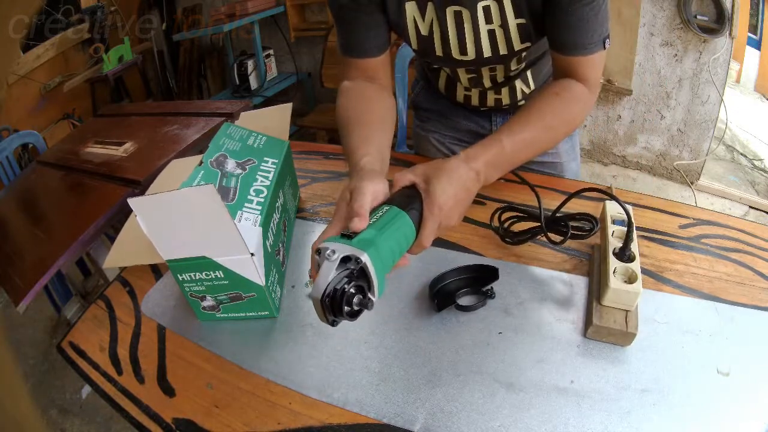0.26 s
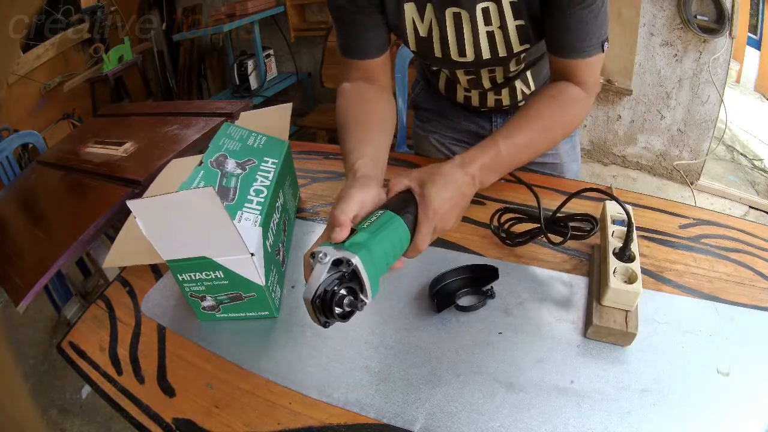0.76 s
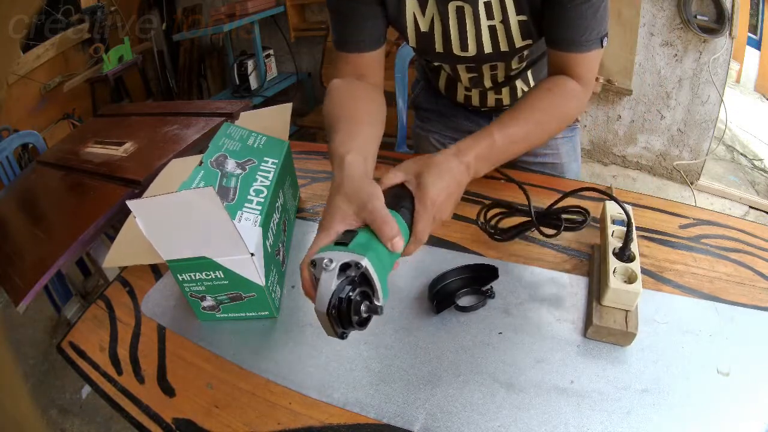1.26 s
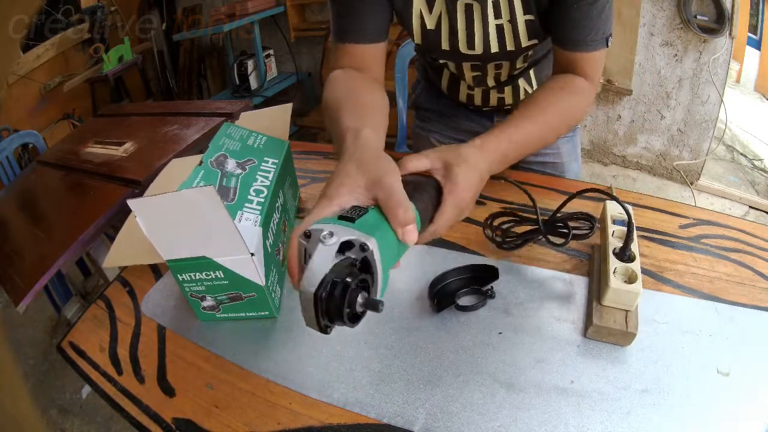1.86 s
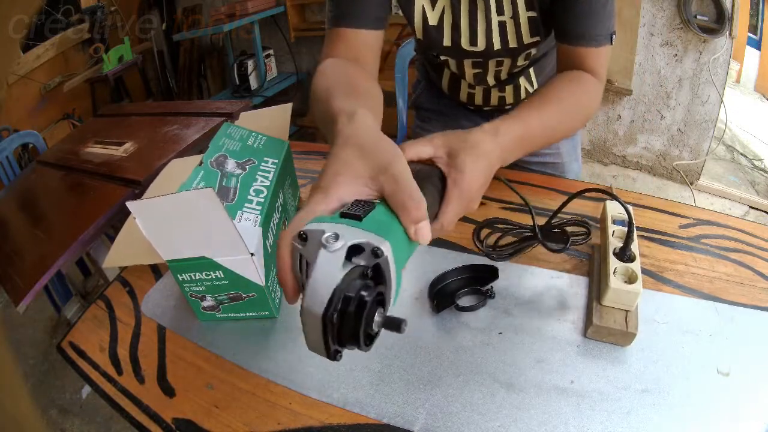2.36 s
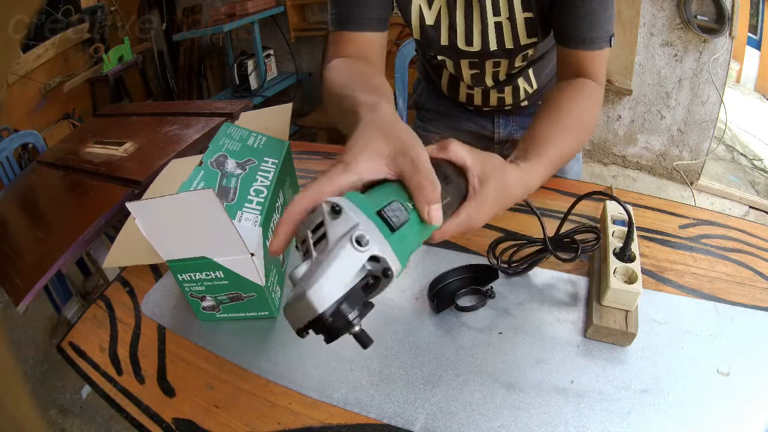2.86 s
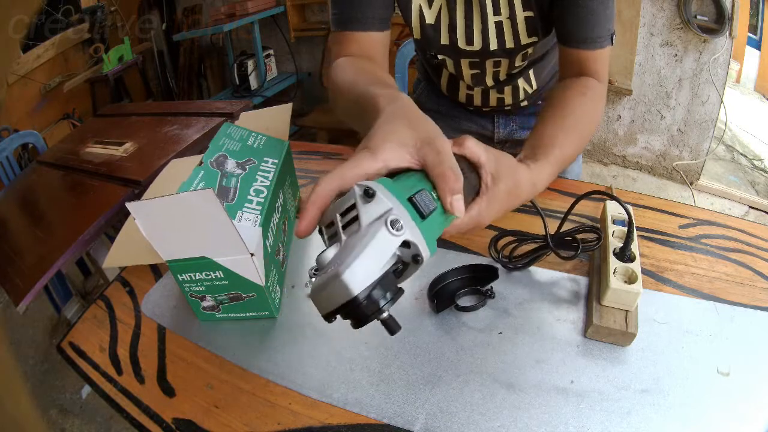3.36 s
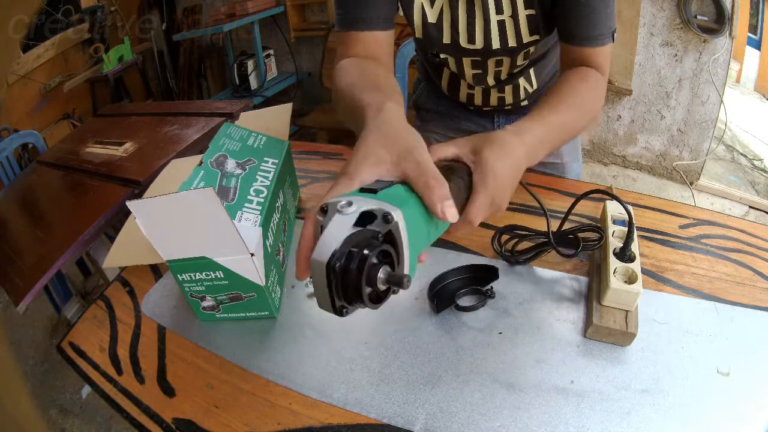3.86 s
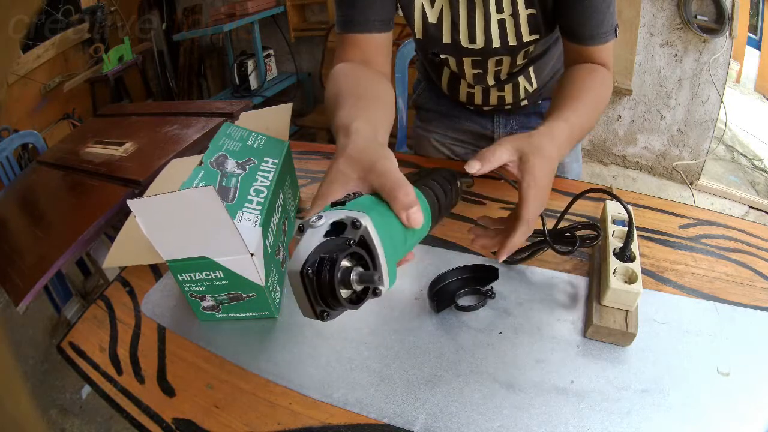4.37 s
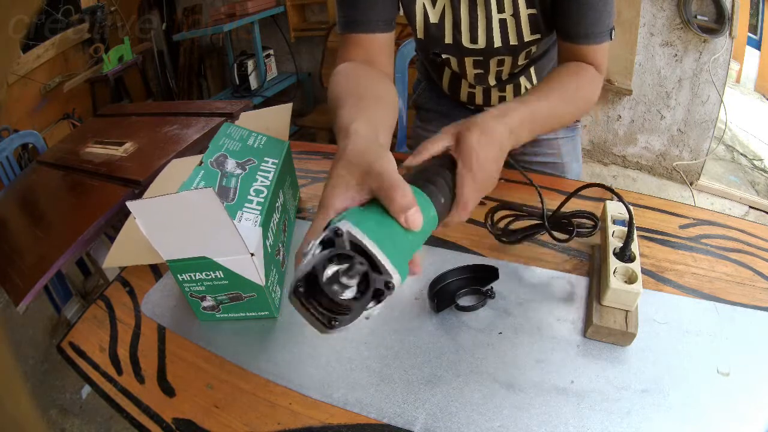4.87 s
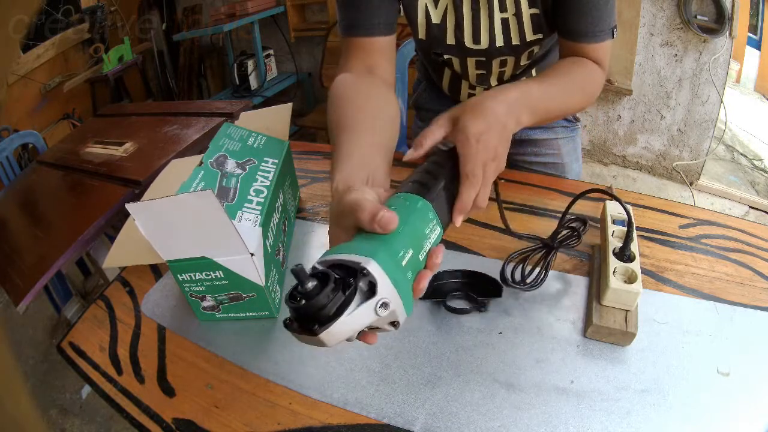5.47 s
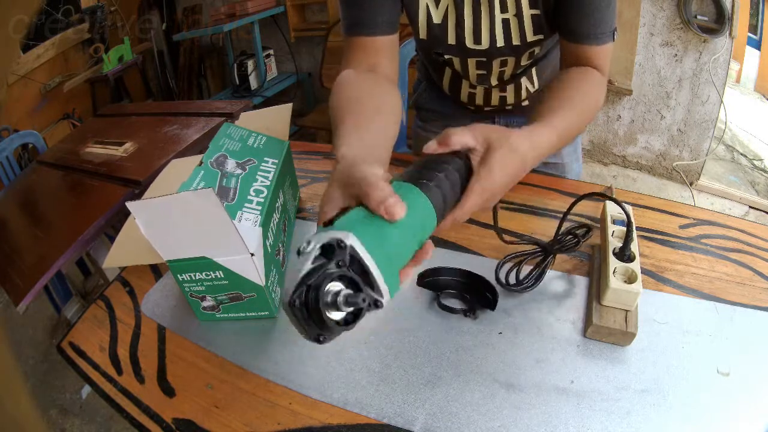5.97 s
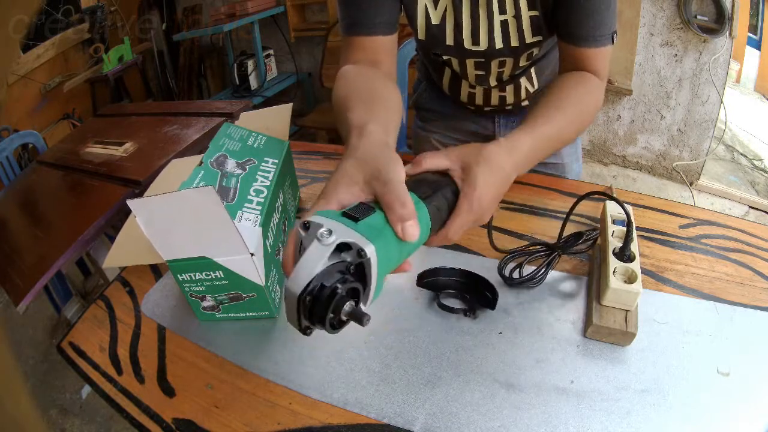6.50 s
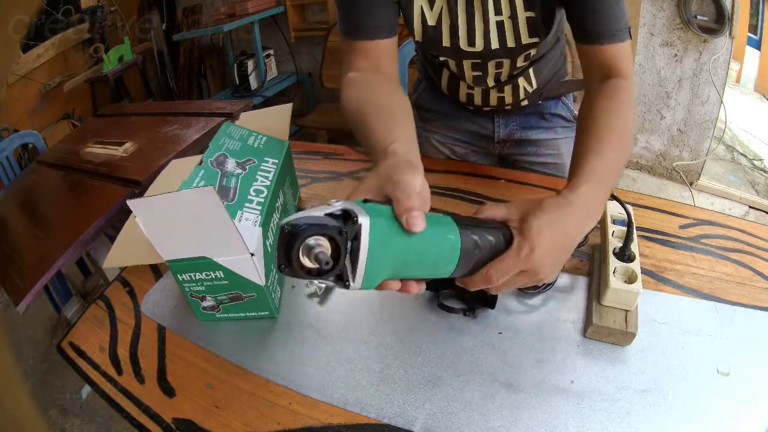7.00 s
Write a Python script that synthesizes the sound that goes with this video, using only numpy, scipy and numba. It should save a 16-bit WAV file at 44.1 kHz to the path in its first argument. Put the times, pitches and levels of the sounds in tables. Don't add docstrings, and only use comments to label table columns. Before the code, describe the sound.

Faint yard hum, a thumb click, then a bare hand-held grinder kicks abruptly into a bright rushing whir, with low wind-like thuds as it turns.

```python
import sys
import numpy as np
from scipy import signal
from scipy.fft import rfft, irfft
from scipy.io import wavfile
from scipy.ndimage import uniform_filter1d
from numba import njit

SR = 44100
rng = np.random.default_rng(int(sys.argv[2]) if len(sys.argv) > 2 else 0)


def to_wav(sig):
    pcm = np.clip(np.atleast_2d(sig), -1, 1) * 32767
    pcm = np.round(pcm).astype(np.int16)
    wavfile.write(sys.argv[1], SR, pcm.T)


def gain_from_db(level_db):
    decades = np.asarray(level_db, float) / 20
    return 10 ** decades


N = 319284
T = np.arange(N) / SR

# (time [s], level [dB])
YARD = [(0, -42), (.246, -42.5), (.3, -41), (.45, -52), (.6, -62), (2.6, -57.5), (3.2, -52), (5.2, -53.5),
        (7.24, -50.5)]
# (frequency [Hz], density [dB per Hz])
YARD_COLOUR = [(15, -30), (30, -2), (70, -1.5), (200, -2.5), (700, -11.5), (3000, -27.5), (5500, -24.5),
               (15000, -34)]
# (frequency [Hz], width [Hz], level [dB])
YARD_DRONES = [(104, 25, -12.5), (337.5, 18, -10.5), (500, 25, -12.5), (750, 16, -6)]
# (time [s], peak [dB], frequency [Hz])
TICKS = [
    (0.1141, -29, 4250),
    (0.2454, -33, 5130),
]
# (speed [Hz], time constant [s])
SPIN_UP = [
    (211, .16),
    (197, .52),
]
# (time [s], depth [0-1])
SPARK = [(.27, 0.4), (.3, 0.6), (.34, 0.33), (.45, 0.15), (.8, 0), (2, 0), (7.24, 0)]
# (time [s], level [dB])
SLAM = [(.272, -27), (.282, -22), (.285, -8), (.31, -2), (.335, -6), (.37, -19), (.46, -16), (.55, -32),
        (.7, -60)]
# (time [s], extra gain [dB])
OVERSHOOT = [(.274, -1), (.284, 11), (.314, 14), (.354, 7.5), (.468, 4.5), (.57, 0), (.68, 0)]
# (time [s], nearness [dB], grip turned to the microphone [0-1],
# side vent aim [-1..1], fan outlet aim [-1..1])
POSE = [(.68, -19.5, 0, 0.025, .1), (1.1, -21, 0.06, .4, 0.37), (2.3, -20, 0, 0.09, 0.34),
        (2.74, -20.5, 0.2, 0.66, 0.29), (2.92, -22.5, .6, 0.27, 0.034), (3.06, -20.5, .6, .3, -.2),
        (3.15, -22.5, 0.46, .1, -.5), (3.24, -19, .4, 0, -1), (3.58, -19.5, 0.55, 0.077, -1.1),
        (3.87, -20, .25, 0.51, -0.36), (4.25, -19.3, 0.55, -.7, -0.2), (5.06, -19.2, 0.74, -0.89, -0.046),
        (5.2, -21.5, 1, 0.76, 0.34), (5.74, -21, 0.97, 0.63, .5), (5.92, -18, .7, -0.93, -.1),
        (6.25, -20, 0.93, -0.27, 0.32), (6.72, -21.5, 0.94, .1, .5), (6.96, -18.5, 0.78, -.6, -0.46)]
# (frequency [Hz], width [Hz], level [dB])
GRIP_MODES = [(605, 425, -8.5), (1198, 303, 0), (1716, 420, -1.5), (2570, 1150, -5.5)]
HEAD_MODES = [(3602, 940, -5.5), (4210, 570, -7), (4840, 810, -1), (6040, 1140, -6)]
VENT_MODES = [(7220, 990, -3.5), (7930, 450, -1), (8430, 850, -3)]
OUTLET_MODES = [(10190, 1400, -3), (11350, 2100, -5), (12000, 890, -3), (12960, 1200, -8),
                (14900, 1400, -16.5)]
# (time [s], half length [s], gain [dB])
WHISTLE_PASSES = [(1.5, .8, 4), (5.88, .12, 8), (6.6, .45, 6)]
WHINE_ORDERS = (1, 2, 12, 24)
# (level [dB], gain with the grip turned [dB], gain per dB of overshoot [1])
TONES = [
    (-51, 12.5, .7),
    (-50, 16.5, 0.5),
    (-56, 0, 0),
    (-42, 0, .4),
]
# (time [s], half length [s], gain [dB])
GLINTS = [
    [(3.2, .4, 3.5), (4.4, 0.45, 3), (.33, .05, 3.5), (5.0, 0.11, -10), (5.4, 0.31, -4.5), (5.78, .1, -11),
     (6.9, 0.49, 3)],
    [(.7, .3, -8), (1.7, .5, 7), (3.2, 0.7, -12), (4.2, .15, 6), (5.35, 0.28, 2.5), (7.0, 0.11, 6)],
    [(.46, .07, 35)],
    [(.355, .05, 21), (.58, .08, 13), (1.16, .25, 13), (1.7, .25, 5), (2.5, .25, -6), (4.4, .6, 9),
     (6.82, .12, 13), (7.24, .15, 6)],
]
# (time [s], centre [Hz])
SIDE_BANDS = [(0.803, 11300), (1.103, 5700), (1.103, 8600), (1.22, 6900), (1.619, 4700), (1.987, 13000),
              (2.152, 12400), (2.198, 11700), (2.241, 9300), (2.405, 7550), (2.405, 13100), (3.289, 10300),
              (3.848, 8250), (4.843, 11300), (6.006, 6000), (6.006, 8250), (6.006, 14000), (6.097, 8950),
              (6.865, 4700)]
# (time [s], peak [dB], time to fall 10 dB [s], 0 = too short to be heard)
GUSTS = [(2.4, -56, 0), (2.76, -38, 0), (2.87, -25, .025), (2.954, -15, 0.02), (3.04, -14.5, 0.0462),
         (3.11, -14, 0.0366), (3.19, -20, .03), (3.28, -16, 0.0535), (3.39, -21, .06), (3.51, -13.5, .05),
         (3.61, -13, .06), (3.69, -16, .04), (3.76, -15.5, .025), (4.03, -29, .025), (4.16, -27, .05),
         (4.22, -27.5, .06), (4.33, -33, .06), (4.44, -23, 0.05), (4.53, -24, 0.06), (4.66, -24.5, .09),
         (4.8, -23.5, 0.08), (4.93, -24.5, 0.06), (5.0, -33, 0.02), (5.99, -40, .03), (6.09, -35, .07),
         (6.2, -31, .05), (6.43, -44, .05), (6.62, -41, 0.03)]
# (time [s], peak [dB], pitch [Hz])
THUMPS = [(2.943, -9, 66), (3.045, -5, 200), (3.074, -5.5, 66), (3.235, -10, 100), (3.385, -14.5, 115),
          (3.568, -9, 70), (3.666, -10, 95), (3.75, -9.5, 95), (4.115, -23, 72.7), (4.197, -18.5, 65),
          (4.43, -11, 62), (4.515, -16, 75), (4.722, -15.5, 95), (4.912, -13, 72), (5.977, -41, 37.7),
          (5.979, -34, 80.7), (6.151, -27, 43.1), (6.395, -36, 70.0)]

DROPOUT_START_S, DROPOUT_END_S = .247, .2725


def curves(table):
    s, *columns = np.transpose(table)
    return [np.interp(T, s, c) for c in columns]


def swells(rows):
    s = T[::64]
    bumps = sum(db * np.exp(-((s - at_s) / half_s) ** 2) for at_s, half_s, db in rows)
    return np.interp(T, s, bumps)


def unit(x):
    return x / np.sqrt(np.mean(x ** 2))


def noise():
    return rng.standard_normal(N)


@njit
def svf(x, hz, width, passes):
    y, b, l, g, k = x.copy(), np.zeros(passes), np.zeros(passes), 0., 0.
    for i in range(len(x)):
        if i % 16 == 0:
            g, k = np.tan(np.pi * hz[i] / SR), width / hz[i]
            c = 1 / (1 + g * (g + k))
        for p in range(passes):
            v = (b[p] + g * (y[i] - l[p])) * c
            b[p], l[p], y[i] = 2 * v - b[p], l[p] + 2 * g * v, k * v
    return y


def ring(x, hz, width):
    return svf(x, hz + np.zeros(N), 1.69 * width, 2)


def walk(rate):
    k = int(SR / rate)
    steps = np.repeat(rng.standard_normal(N // k + 1), k)[:N]
    return unit(uniform_filter1d(uniform_filter1d(steps, k), k))


def yard():
    hz, db = np.transpose(YARD_COLOUR)
    bins = np.log(np.arange(N // 2 + 1) * SR / N + 1)
    colour = gain_from_db(np.interp(bins, np.log(hz), db))
    hum = unit(irfft(rfft(gain_from_db(0.88 * walk(13)) * noise()) * colour, N))
    drones = sum(gain_from_db(db) * unit(ring(noise(), hz, width)) for hz, width, db in YARD_DRONES)
    out = gain_from_db(curves(YARD)[0]) * (hum + drones)
    for s, peak_db, tick_hz in TICKS:
        scrape = np.exp(-np.abs(T - s - .001) / 0.0013) * noise()
        tick = svf(scrape, tick_hz + np.zeros(N), 4000., 1)
        out += gain_from_db(peak_db - 3) * tick / np.max(np.abs(tick))
    return out


def speed():
    switch_s, free_turns_hz = .27, 598.3
    sag_hz, sag_at_s, sag_over_s = 2.2, 4.7, .2
    since_s = np.clip(T - switch_s, 0, None)
    missing = sum(gap_hz * np.exp(-since_s / lag_s) for gap_hz, lag_s in SPIN_UP)
    return free_turns_hz - missing - sag_hz / 2 * (1 + np.tanh((T - sag_at_s) / sag_over_s))


def fan_level_db():
    power, full_hz = 3.3, 470
    return power * 20 * np.log10(np.minimum(speed() / full_hz, 1))


def turbulence():
    mains_beat_hz, first_spark_s = 100, .282
    depth = np.clip(curves(SPARK)[0], 0, 1)
    throb = 1 - depth * np.cos(2 * np.pi * mains_beat_hz * (T - first_spark_s))
    return throb / np.sqrt(1 + depth ** 2 / 2) * gain_from_db(0.76 * walk(300) + 0.58 * walk(12))


def part(modes, drive, flicker_db, drift=0.007):
    out = 0
    for hz, width, db in modes:
        level = gain_from_db(db + flicker_db * walk(9))
        out = out + level * ring(drive * noise(), hz * (1 + drift * walk(4)), width)
    return unit(out)


def beam(drive, hz, width):
    return unit(ring(drive * noise(), hz, width))


def aimed(hz, shift):
    return hz * (1 + shift + 0.01 * walk(6))


def slam(drive):
    return gain_from_db(curves(SLAM)[0]) * beam(drive, 4650, 680)


def gear_head(drive):
    _, grip_turn, _, outlet_aim = curves(POSE)
    main_beam = beam(drive, aimed(5160, -.04 * outlet_aim), 800)
    head = unit(part(HEAD_MODES, drive, flicker_db=0.83) + gain_from_db(-5) * main_beam)
    turned_to_mic = outlet_aim + 0.67 * np.clip(grip_turn - .5, 0, 1)
    head += gain_from_db(-10 - 6 * turned_to_mic) * beam(drive, 6500, 1270)
    head += gain_from_db(-15 + 1.5 * fan_level_db()) * beam(drive, 14000, 1600)
    return head


def grip(drive):
    grip_turn = curves(POSE)[1]
    level_db = -15 + 8.5 * grip_turn + 0.27 * curves(OVERSHOOT)[0]
    palm = gain_from_db(-24 + 17 * grip_turn) * beam(drive, 980, 520)
    return gain_from_db(level_db) * (part(GRIP_MODES, drive, flicker_db=0.52) + palm)


def side_vent(drive):
    aim = curves(POSE)[2]
    vent = part(VENT_MODES, drive, flicker_db=1.2)
    vent = unit(vent + gain_from_db(-3.5) * beam(drive, aimed(7810, .012 * aim), 640))
    return gain_from_db(-3.5 + 4 * aim + 0.69 * fan_level_db()) * vent


def fan_outlet(drive):
    _, _, vent_aim, outlet_aim = curves(POSE)
    outlet = part(OUTLET_MODES, drive, flicker_db=0.0)
    outlet = unit(outlet + gain_from_db(-5) * beam(drive, aimed(10810, .045 * vent_aim), 940))
    whistle_db = -15.5 + swells(WHISTLE_PASSES) + 1.8 * walk(3.95)
    outlet += gain_from_db(whistle_db) * beam(drive, 13650, 450)
    outlet += gain_from_db(-12.5 + 9.5 * vent_aim) * beam(drive, 11950, 400)
    return gain_from_db(-0.33 + 4 * outlet_aim + 0.89 * fan_level_db()) * outlet


def hiss():
    drive = turbulence()
    housing = gear_head(drive) + grip(drive) + side_vent(drive) + fan_outlet(drive)
    return gain_from_db(curves(POSE)[0] + curves(OVERSHOOT)[0]) * housing + slam(drive)


def whine():
    turns = np.cumsum(speed() * (1 + 0.00056 * walk(60))) / SR
    grip_turn, extra_db = curves(POSE)[1], curves(OVERSHOOT)[0]
    out = 0
    for order, (tone_db, turn_db, share), glints in zip(WHINE_ORDERS, TONES, GLINTS):
        db = tone_db + turn_db * grip_turn + share * extra_db + swells(glints)
        db = db + (1.0 + .08 * order) * walk(25)
        out = out + np.sqrt(2) * gain_from_db(db) * np.sin(2 * np.pi * order * turns)
    return out


def side_noise():
    half_s, level_db, half_width = 1024 / SR, -28, 0.11
    side = np.zeros(N)
    size = int(2 * half_s * SR)
    bins = np.arange(size // 2 + 1) * SR / size
    window = signal.windows.kaiser_bessel_derived(size, 4 * np.pi)
    for s, hz in SIDE_BANDS:
        band = irfft(rfft(rng.standard_normal(size)) * (np.abs(bins / hz - 1) < half_width), size)
        start = int((s - half_s) * SR)
        side[start:start + size] += gain_from_db(level_db) * unit(band) * window
    return np.array([side, -side])


def thumps():
    out = np.zeros(N)
    for (s, peak_db, hz), phase in zip(THUMPS, rng.random(len(THUMPS))):
        cycles = np.arange(int(4 * SR / hz)) * hz / SR
        envelope = cycles / 0.72 * np.exp(1 - cycles / 0.76)
        swing = envelope * np.sin(2 * np.pi * (cycles - 0.037 * cycles ** 2 + phase))
        start = int(s * SR)
        out[start:start + len(swing)] += gain_from_db(peak_db - 2.5) * swing
    return out


def draught():
    slow = T[::32]
    power = sum(gain_from_db(peak_db - 10 * np.abs(slow - s) / fall_s) ** 2 if fall_s else
                gain_from_db(peak_db - 10 * np.abs(slow - s) / 1e-9) ** 2 for s, peak_db, fall_s in GUSTS)
    gust = np.interp(T, slow, np.sqrt(power))
    rustle = gain_from_db(-46.5) * np.minimum((gust / gain_from_db(-31)) ** 0.4, gust / gain_from_db(-49))
    puffs = gain_from_db(1.8 * walk(30)) * noise()
    eddy_hz = np.clip(100 * (1 + .18 * walk(15)), 30, 300)
    eddies = unit(ring(puffs, eddy_hz, 58))
    eddies = eddies + gain_from_db(-5.5) * unit(ring(puffs, 57, 42))
    eddies = eddies + gain_from_db(-9.5) * unit(ring(puffs, 174, 130))
    return gain_from_db(-2) * (gust * unit(eddies) + rustle * unit(ring(puffs, 390, 290))) + thumps()


def scene():
    gusts = draught()
    felt = signal.lfilter([1 / (0.028 * SR)], [1, 1 / (0.019 * SR) - 1], gusts ** 2)
    duck = (1 + felt / gain_from_db(-18) ** 2) ** -.36
    mono = yard() + duck * (T > DROPOUT_END_S) * (hiss() + whine()) + gusts
    return np.array([mono, mono])


def top_cut(x):
    return signal.sosfilt(signal.butter(12, 15630, fs=SR, output="sos"), x)


def record(dry):
    top_hz = 15330
    muted = (T > DROPOUT_START_S) & (T < DROPOUT_END_S)
    bass = signal.sosfilt(signal.butter(2, 300, fs=SR, output="sos"), dry)
    trail = bass * np.exp(-np.clip(T - DROPOUT_START_S, 0, 1) / 0.0086)
    x = np.where(muted, trail + gain_from_db(-10) * dry, dry)
    low_pass = signal.ellip(10, .2, 70, top_hz, fs=SR, output="sos")
    x = signal.sosfilt(low_pass, np.clip(x, -.8, .8))
    return top_cut(x + side_noise())


dry = scene()
out = record(dry)
to_wav(out)
```